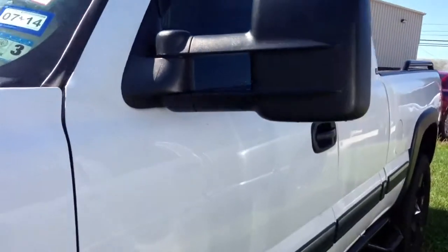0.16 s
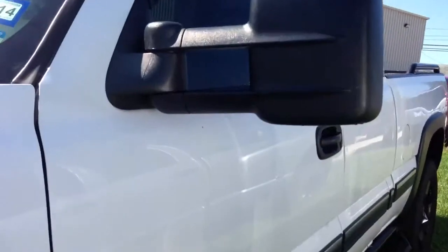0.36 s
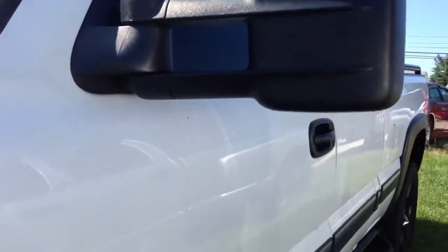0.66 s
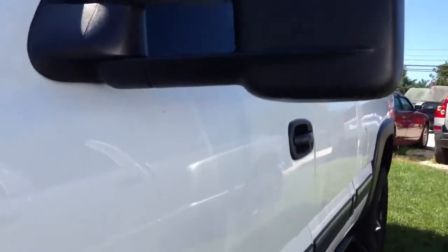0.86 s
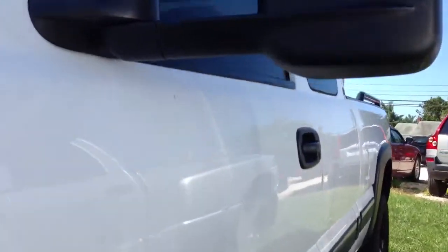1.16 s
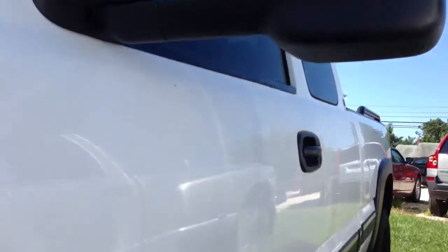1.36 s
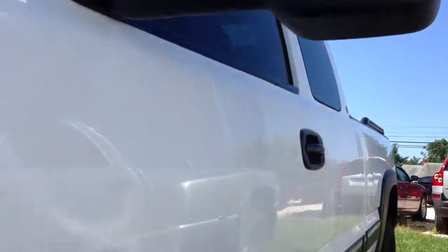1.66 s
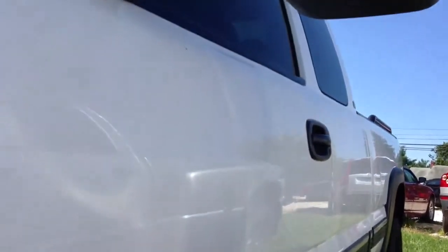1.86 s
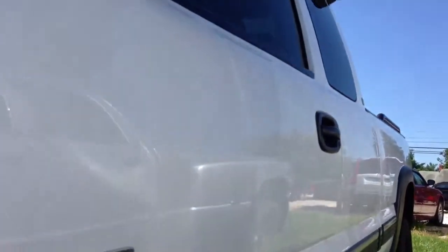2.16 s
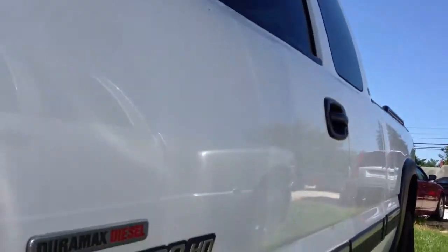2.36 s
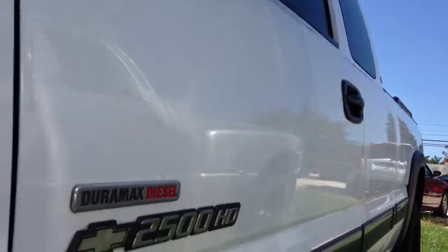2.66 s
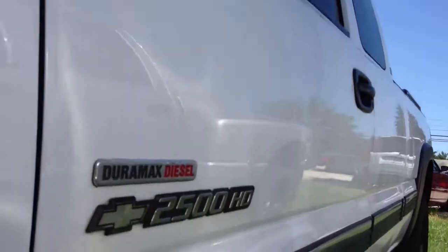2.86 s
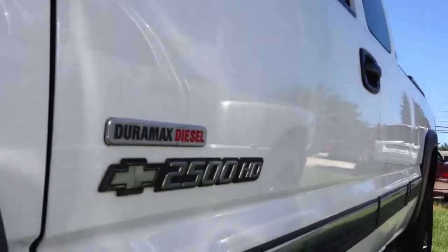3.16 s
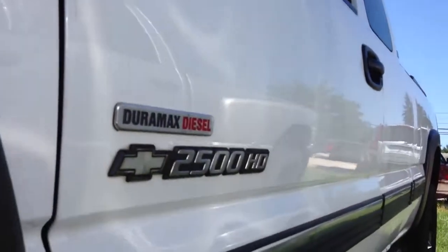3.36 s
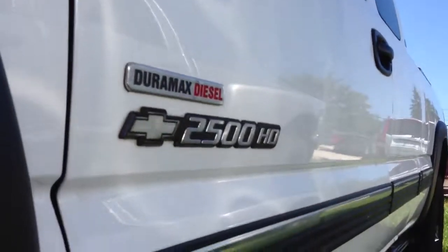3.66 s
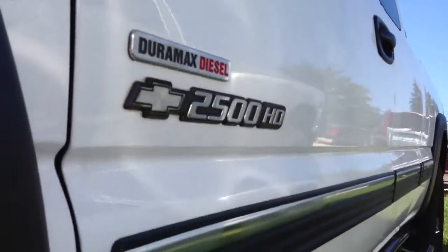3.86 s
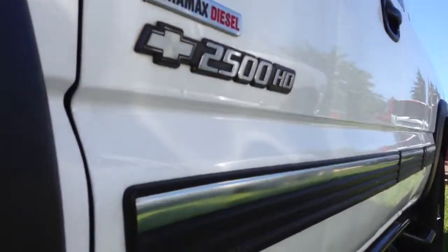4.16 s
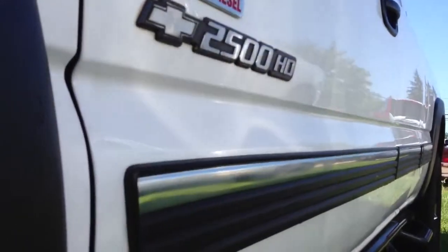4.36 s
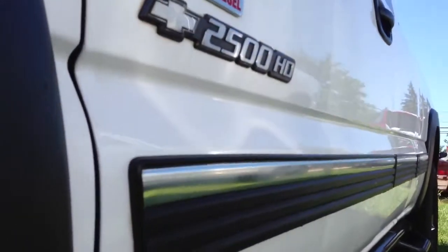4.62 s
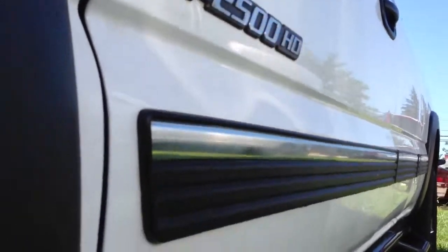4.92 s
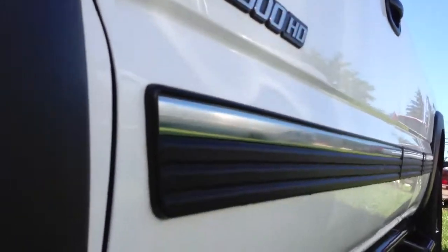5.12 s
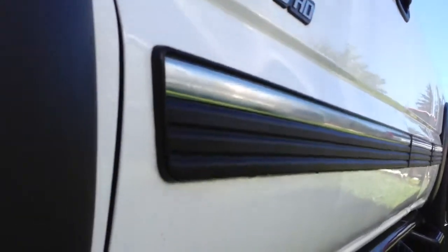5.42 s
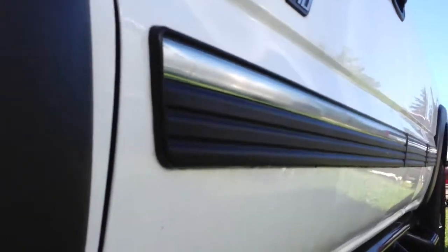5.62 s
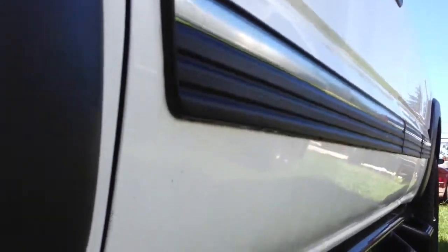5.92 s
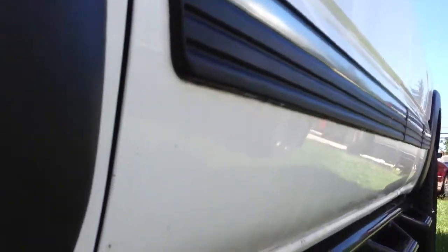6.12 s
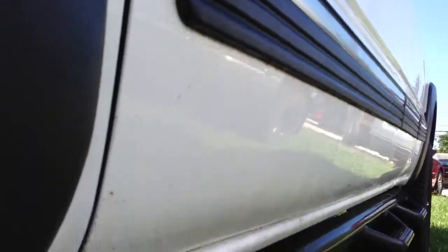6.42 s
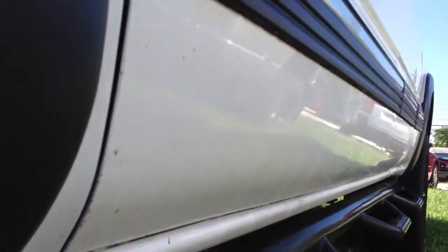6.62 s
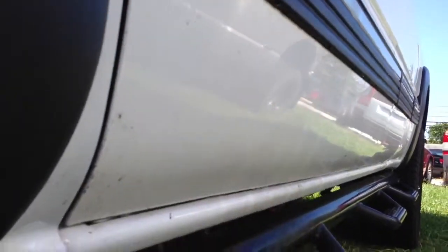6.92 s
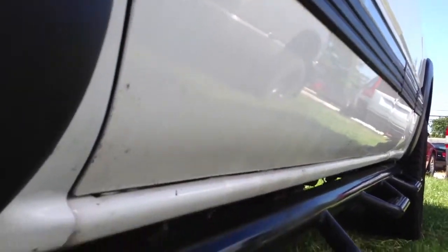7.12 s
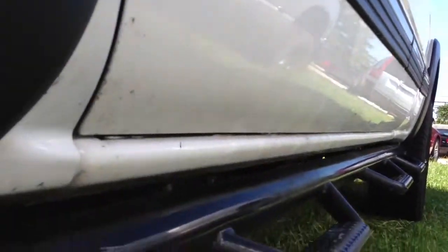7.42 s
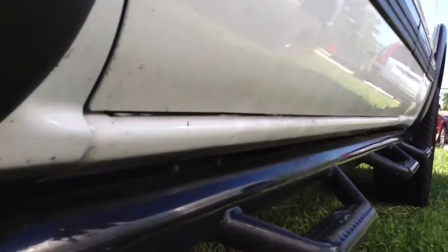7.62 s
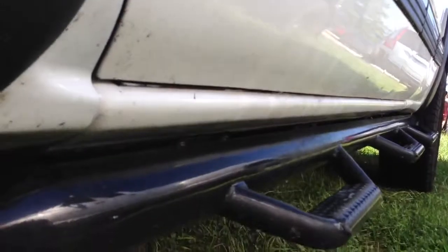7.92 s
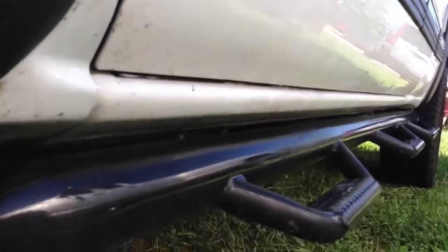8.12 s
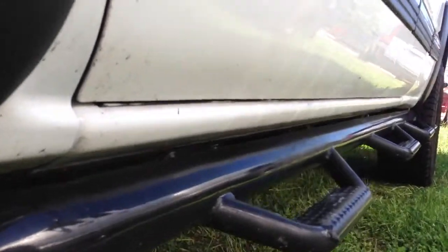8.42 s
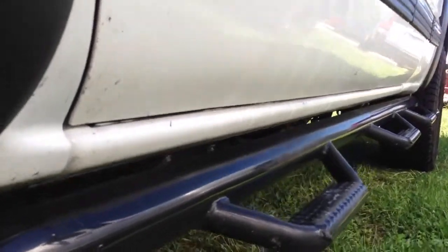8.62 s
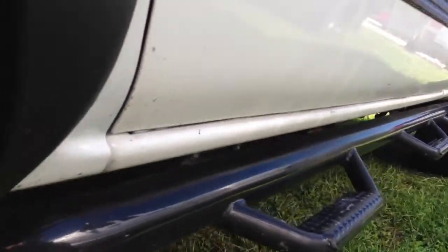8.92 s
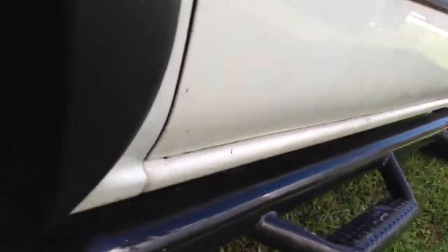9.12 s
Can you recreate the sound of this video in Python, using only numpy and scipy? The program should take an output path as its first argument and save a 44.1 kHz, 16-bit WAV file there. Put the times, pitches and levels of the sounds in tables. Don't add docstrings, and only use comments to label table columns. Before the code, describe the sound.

Low diesel idle hum beside a truck on grass, bumpy handling thuds, cloth rustle and small clicks, a thin cricket trill and katydid buzzes behind.

```python
import sys
import numpy as np
from scipy import signal
from scipy.io import wavfile
from scipy.ndimage import uniform_filter1d

SR = 44100
rng = np.random.default_rng(int(sys.argv[2]) if len(sys.argv) > 2 else 0)


def ratio_of_db(decibels):
    return 10 ** (np.asarray(decibels, float) / 20)


def transcribe(signal):
    frames = np.atleast_2d(signal).T
    limited = np.clip(frames, -1, 1)
    pcm = np.round(limited * 32767).astype(np.int16)
    wavfile.write(sys.argv[1], SR, pcm)


N = 409248
T = np.arange(N) / SR

# (pitch [Hz], level [dB])
HISS_COLOUR = [(300, -15), (2000, -1), (5000, 2.5), (10000, -3), (15000, -1)]
# (first buzz [s], gap [s], buzzes [count], level [dB], pitch [Hz])
KATYDID_PHRASES = [(.05, .17, 4, -66, 9430), (.76, .158, 3, -66, 9400), (1.235, .172, 6, -66, 9350),
                   (2.27, .2, 2, -65.5, 9380), (2.635, .2, 2, -65, 9330), (3.04, .171, 6, -63.5, 9400),
                   (4.02, .165, 6, -70, 9350), (5, .15, 3, -68, 9400), (5.585, .14, 2, -66.5, 9300),
                   (5.98, .152, 2, -65, 9300), (6.284, .1545, 9, -61, 9330), (6.828, .1535, 6, -66, 9500),
                   (7.745, .16, 3, -62, 9520), (8.224, .172, 4, -63, 9560), (8.9, .172, 3, -63, 9560),
                   (.086, .2, 6, -64.5, 9010), (2.39, .2, 4, -69, 8950), (3.39, .196, 4, -67.5, 8970),
                   (4.168, .19, 2, -64, 8980), (4.92, .198, 3, -66, 8950), (5.724, .2, 3, -66, 8930),
                   (8.79, .15, 3, -67, 9030), (7.6, .16, 1, -63, 9300)]
# (time [s], level [dB])
CRICKET_LEVEL = [(0, -83), (.6, -85), (.95, -77), (1.45, -85), (1.8, -78), (2.05, -89), (2.45, -79.5),
                 (3, -81.5), (3.25, -75), (3.8, -89.5), (4.25, -75), (5, -83.5), (5.55, -72.5),
                 (6.2, -80.5), (7.35, -79.5), (7.8, -77), (8.6, -77.5), (9.28, -75)]
# (time [s], lead [strokes], tiredness [0-1])
CRICKET_PACE = [(0, .52, 0), (.85, .34, 0), (2, .34, 0), (2.4, .45, 0), (3, .46, 0), (3.5, .5, 0),
                (4, .5, 0), (4.4, .54, 0), (5, .54, 0), (6.9, .44, 0), (7.15, .43, 1), (8.2, .48, 1),
                (8.7, .52, .4), (9.1, .5, .4), (9.28, .44, 0)]
# (time [s], half length [s], level change [dB])
CRICKET_LEANS = [(.35, .07, 4), (.8, .04, 4), (1.35, .06, 4), (1.77, .05, 2), (1.92, .07, -4),
                 (2.33, .06, -5), (2.76, .1, 3), (3.08, .05, -4), (3.88, .1, 4), (6.9, .12, 2),
                 (7.25, .15, -2), (8.6, .08, 3.5), (8.82, 0.078, -8), (9.03, .1, 3), (9.18, .03, -8)]
# (pitch [Hz], level [dB])
RUMBLE_COLOUR = [(12, -51), (20, -27.5), (64, -27.5), (81, -16), (103, -13), (120, -4), (160, -43),
                 (260, -120)]
# (time [s], level change [dB])
RUMBLE_SWELLS = [(0, 2), (.8, 2.5), (1.4, 16.5), (1.8, 1), (2.2, 0), (2.55, 5), (2.9, -2), (3.45, 5),
                 (3.8, -11), (4.6, -10), (5.5, -6), (7.5, 2), (9.28, -2.5)]
# (time [s], wind level [dB], wash level [dB])
AIR_LEVELS = [(0, -54, -53.5), (.6, -50.5, -53.5), (1.1, -52.5, -54.5), (1.6, -55, -55.5),
              (2.4, -59.5, -60), (2.8, -58, -62.5), (3.3, -55, -59.5), (3.9, -57.5, -59.5),
              (4.8, -55, -61.5), (5.2, -56.5, -63), (6, -56.5, -63.5), (6.8, -64, -67), (7.6, -60.5, -64.5),
              (8, -63.5, -64.5), (8.75, -64.5, -64.5), (9.1, -56, -60.5), (9.28, -60, -60)]
# (pitch [Hz], level [dB])
WIND_COLOUR = [(200, -21), (250, 0), (330, -1), (410, 1), (480, -6.5), (600, -9), (900, -35)]
# (pitch [Hz], level [dB])
WASH_COLOUR = [(290, -31), (500, -38), (628, -2), (692, -1), (808, -1.5), (944, -2.5), (1190, 0),
               (1330, -3.5), (1750, -5), (2570, -10.5), (3100, -16.5), (3500, -16.5), (4550, -40),
               (7700, -120)]
# (pitch [Hz], width [Hz], level [dB])
HUMMING_PANELS = [(817, 44, 3.5), (1029, 58, 1), (1247, 22, -5), (1442, 77, 0.5), (1710, 81, -11),
                  (2320, 190, -9.5)]
# (pitch [Hz], level [dB])
RUSTLE_COLOUR = [(1500, -6), (2400, -4.5), (3200, -0.5), (4200, -2), (7000, -7), (10000, -18.5)]
# (pitch [Hz], level [dB])
FIZZ_COLOUR = [(6000, -8), (9000, 7.5), (15300, -8)]
# (time [s], half length [s], rustle level [dB], fizz level [dB])
WALKER_BRUSHES = [
    (0.022, 0.05, -63, -84),
    (.3, .1, -72, -79),
    (.55, 0.12, -63.5, -79),
    (0.744, 0.17, -67, -86),
    (0.906, 0.13, -62.5, -75),
    (8.93, .08, -79, -86),
    (9.083, 0.1, -69.5, -78),
]
# (pitch [Hz], width [Hz])
LOOSE_TRIM = [(1750, 140), (2050, 130), (2400, 120), (2750, 150)]
# (time [s], half length [s], pitch [Hz], width [Hz], level [dB])
SCUFF_PATCHES = [(0.438, .018, 1710, 64, -55), (.7, 0.023, 2450, 500, -58), (0.54, 0.022, 1750, 200, -61),
                 (.82, 0.028, 2490, 350, -59), (1.003, .04, 2300, 500, -61), (0.898, 0.013, 2350, 400, -60),
                 (1.25, .05, 2160, 250, -65), (1.2, .2, 1900, 1100, -74), (4.299, .25, 1700, 1200, -71),
                 (5.15, .15, 960, 200, -64), (1.65, .2, 1820, 500, -65), (1.78, 0.22, 3450, 350, -69.5),
                 (4.06, 0.03, 2200, 1000, -62), (4.16, .03, 1900, 900, -66), (7.75, 0.35, 2200, 500, -74.5),
                 (7.95, 0.35, 1280, 320, -71.5), (8.05, .3, 1630, 250, -75), (8.5, .05, 1500, 500, -66.5),
                 (8.92, 0.17, 1600, 400, -67.5), (9.0, 0.26, 4200, 700, -71),
                 (9.22, 0.12, 1700, 500, -63.5), (.04, .04, 5000, 500, -65), (9.22, .08, 4300, 400, -74),
                 (1.2, .15, 1200, 40, -64), (1.38, .1, 1240, 40, -65), (1.7, .1, 1250, 40, -66),
                 (1.25, .2, 800, 40, -66), (2.2, .25, 810, 50, -70), (2.85, .18, 1200, 40, -72),
                 (3.35, .25, 1010, 35, -70), (3.8, .2, 1050, 40, -68), (5.45, .4, 4240, 70, -82),
                 (6.6, .35, 4220, 80, -81), (9.05, 0.2, 3930, 80, -78), (3.4, 0.11, 2050, 50, -76),
                 (2, .12, 1260, 40, -70), (.7, .1, 2520, 70, -67)]
# (time [s], peak level [dB], ring pitch [Hz], time to die by 60 dB [s])
LIGHT_CLICKS = [(.084, -51.5, 2280, .03), (0.7, -53, 1700, .02), (.785, -50, 1740, .02),
                (.959, -52, 1600, .03), (1.033, -53, 1800, .03), (0.43, -55, 1800, .03),
                (0.801, -54, 2500, 0.11), (.892, -54, 2400, 0.057), (7.1256, -56, 1850, 0.014),
                (8.447, -54, 1050, .015), (9.057, -56, 2600, 0.014), (9.1635, -53.5, 2500, 0.014),
                (9.172, -61, 1600, .04), (7.803, -61, 2150, .02), (8.436, -65, 1900, 0.041),
                (7.1256, -62, 2780, .012), (7.1256, -62, 2300, .01), (9.158, -46.5, 720, 0.022),
                (8.4, -61, 800, .03), (8.9416, -60, 1750, .012), (7.116, -63, 2000, .012),
                (.8, -53, 5800, .02), (7.1256, -58.5, 4500, .005), (7.1262, -61, 1220, 0.014),
              (9.021, -58, 4000, .01), (9.058, -61, 4600, .01), (9.07, -62, 5200, .006),
              (9.08, -60, 4300, .004), (9.08, -62, 5300, .004), (7.132, -61, 1700, .01),
              (0.59, -53, 2600, 0.022), (1.0, -55, 2200, 0.044), (9.0204, -56, 4570, .008),
              (9.079, -60, 6300, .006), (9.066, -63, 6000, .006), (9.163, -58, 2700, .012),
              (9.03, -62, 3600, .008), (9.133, -62, 2500, .008), (0.91, -60, 5400, .02),
              (9.023, -58, 3000, .008)]
# (time [s], peak level [dB], pitch [Hz], length [s])
MIC_PUFFS = [(0.223, -38.5, 368, 0.035), (0.318, -43, 290, 0.027), (0.642, -37, 286, 0.03),
             (0.684, -38, 409, 0.02), (0.948, -39.5, 316, 0.032), (1.001, -31.5, 364, 0.024),
             (1.384, -46, 356, 0.037), (1.536, -34, 303, 0.032), (1.554, -37, 600, 0.032),
             (1.575, -35, 453, 0.026), (1.612, -48, 320, 0.02), (2.167, -40, 330, 0.021),
             (2.585, -47, 450, 0.026), (2.725, -42.5, 413, 0.024), (3.227, -41.5, 320, 0.048),
             (3.531, -43, 408, 0.023), (4.92, -53, 560, 0.019), (8.432, -47, 500, 0.039),
             (8.453, -53, 417, 0.017)]
# (time [s], peak level [dB], quickness [Hz])
PRESSURE_JABS = [(0.2312, -23, 200), (.2455, -27, 257), (0.2587, -30, 330), (0.278, -27, 217),
                 (.339, -28, 236), (0.373, -29.5, 200), (0.388, -42, 600), (0.9611, -33, 230),
                 (1.007, -36, 380), (1.016, -34, 360), (1.0278, -32, 340), (1.0251, -33, 380),
                 (1.0045, -37, 340), (1.5503, -31, 380), (1.5583, -33, 420), (1.5625, -28.5, 420),
                 (1.5651, -26, 420), (1.5677, -22, 420), (1.5725, -34, 450), (1.582, -33, 330),
                 (1.5875, -28, 400), (1.5925, -37, 300), (2.095, -35, 247), (1.575, -26, 280),
                 (1.682, -37, 300), (1.7028, -29.5, 198), (2.524, -30, 180), (2.5705, -32, 215),
                 (2.5672, -38, 360), (2.5787, -37, 460), (2.5831, -32, 460), (2.583, -27, 190),
                 (2.549, -32, 170), (2.582, -30, 460), (2.7056, -37, 270), (2.7394, -37, 420),
                 (2.7323, -32.5, 300), (2.7533, -29, 200), (3.218, -30, 198), (3.2658, -29, 300),
                 (3.2795, -30.5, 230), (3.4285, -31.5, 290), (3.4403, -34, 280), (3.505, -32.5, 197),
                 (4.0286, -32, 239), (4.062, -35.5, 328), (4.892, -38, 298), (4.92, -30.5, 270),
                 (4.9272, -34, 400), (4.906, -41, 300), (4.93, -38, 360), (8.4502, -35, 480),
                 (8.4575, -42, 400), (8.464, -36.5, 239), (9.1605, -42, 640), (1.772, -41.5, 400),
                 (1.625, -38, 270), (9.147, -47, 500), (9.061, -47, 600)]
# (pitch [Hz], level [dB])
PIPE_RESPONSE = [(40, -44), (90, -27), (110, -26), (140, -15), (162, -15), (184, 0), (210, -1), (222, -12),
                 (236, -20), (260, -28), (400, -34), (600, -50)]
# (pitch [Hz], level [dB])
BURN_COLOUR = [(70, -37), (100, -36), (130, -13), (160, -0.5), (185, 3), (210, -9), (235, -12), (270, -24),
               (330, -34)]
# (time [s], crankshaft speed [turns/s])
IDLE_SPEED = [(0, 11.29), (.5, 11.23), (.9, 11.03), (1.6, 10.91), (2.5, 10.8), (3.9, 10.84), (4.2, 11.03),
              (4.8, 11.53), (5.1, 12.02), (5.4, 12.3), (5.7, 12.42), (6.6, 12.37), (7.5, 12.37),
              (7.8, 12.21), (8.1, 11.92), (8.4, 11.81), (9.28, 11.81)]
# (time [s], hum level [dB], odd over even orders [dB], unsteady burn level [dB])
ENGINE_LEVELS = [(0, -44.5, -11, -40.5), (.3, -50.5, -5.5, -39), (.6, -54.5, -5, -44), (1.5, -59, 21, -44),
                 (1.85, -57, -4, -39), (2.15, -50.5, 12, -44), (2.5, -52, 20, -45), (3.3, -50.5, -2, -43.5),
                 (3.9, -48, 12, -44.5), (4.5, -45, 10, -45.5), (4.8, -41.5, 8, -42), (5.1, -39, 9, -47),
                 (5.4, -39.5, 10, -48), (6.3, -44.5, 13, -51), (7.3, -44.5, 10, -54), (7.8, -48, 10, -50),
                 (8.4, -54, 6, -52), (9.28, -50, 4, -54)]

BASS_CUT = signal.butter(4, 120, "high", fs=SR, output="sos")


def evened(x):
    return x / np.sqrt(np.mean(x ** 2) + 1e-20)


def read(points, hz):
    f, value = np.transpose(points)
    return np.interp(np.log(hz + 1), np.log(f + 1), value, left=-90, right=-90)


def columns(rows):
    s, *rest = np.transpose(rows)
    return [np.interp(T, s, c) for c in rest]


def add(mix, s, sound):
    part = mix[max(round(s * SR), 0):][:len(sound)]
    part += sound[:len(part)]


def drift(rate_hz):
    steps = rng.standard_normal(400)
    return np.interp(T * rate_hz, np.arange(400), uniform_filter1d(steps, size=2) * np.sqrt(2))


def noise(points, patchy_db, size=1024):
    frames = 4 * N // size + 12
    hz = np.fft.rfftfreq(size, 1 / SR)
    a, b, patches = rng.standard_normal((frames, len(hz), 3)).T
    patches = uniform_filter1d(patches, size=10, axis=0)
    patches = evened(uniform_filter1d(patches, size=10, axis=1))
    z = (a + 1j * b) * ratio_of_db(read(points, hz)[:, None] + patchy_db * patches)
    sound = signal.istft(z, nperseg=size, noverlap=3 * size // 4)[1]
    return evened(sound[size:N + size])


def band(x, hz, width):
    r = np.exp(-np.pi * width / SR)
    return signal.lfilter([1, 0, -1], [1, -2 * r * np.cos(2 * np.pi * hz / SR), r * r], x)


def hiss():
    return ratio_of_db(-68) * noise(HISS_COLOUR + [(20000, HISS_COLOUR[-1][1])], patchy_db=0.1)


def rumble():
    swell_db = columns(RUMBLE_SWELLS)[0] + 1.5 * drift(8)
    return ratio_of_db(swell_db - 63) * noise(RUMBLE_COLOUR, patchy_db=3.5, size=4096)


def katydids():
    out = np.zeros(N)
    for first, gap, count, db, pitch_hz in KATYDID_PHRASES:
        for s in first + gap * np.arange(count):
            hz = pitch_hz + 60 * rng.standard_normal()
            at = np.cumsum(SR / 132 * rng.uniform(.92, 1.08, 10)).astype(int) - 280
            scrapes = np.zeros(3500)
            scrapes[at] = at < .05 * SR
            rasp = signal.lfilter([1], [1, -.991], scrapes) * rng.standard_normal(3500)
            buzz = band(band(rasp, hz, 290), hz, 330)
            level = ratio_of_db(db - 14 + 1.2 * rng.standard_normal())
            add(out, s - .012, level * evened(buzz))
    return out


def cricket():
    strokes_per_s, sag_hz, fall_hz, tired_fall_hz = 17.05, 50, 519, 130
    (level_db,), (lead, tired) = columns(CRICKET_LEVEL), columns(CRICKET_PACE)
    phase = (T * strokes_per_s + lead + 0.054 * drift(10) + .5) % 1 - .5
    u = np.clip(phase / .4 + .62, 0, 1)
    fall = (fall_hz + tired_fall_hz * tired) * u ** (6.5 - 3 * tired)
    hz = 8050 - sag_hz * tired - fall + 25 * drift(30)
    stroke = np.sin(np.pi * u ** 1.44) * ratio_of_db(0.88 * drift(14))
    teeth = 1 + 0.24 * evened(band(rng.standard_normal(N), 230, 280))
    tone = stroke * teeth * np.sin(2 * np.pi * np.cumsum(hz) / SR)
    for s, half, db in CRICKET_LEANS:
        level_db = level_db + db * np.exp(-((T - s) / half) ** 2)
    return ratio_of_db(level_db + 3.5) * evened(tone)


def wash():
    _, wash_db = columns(AIR_LEVELS)
    panels = np.zeros(N)
    for hz, width, db in HUMMING_PANELS:
        panels += ratio_of_db(db + 2.5 * drift(6)) * evened(band(rng.standard_normal(N), hz, width))
    sound = ratio_of_db(wash_db - 1.5) * (noise(WASH_COLOUR, patchy_db=1.5) + ratio_of_db(-14.5) * panels)
    low = signal.sosfiltfilt(signal.butter(2, 1000, fs=SR, output="sos"), sound)
    shade_db = np.interp(T, (5.9, 7.8), (0, -2.5))
    return sound - (1 - ratio_of_db(shade_db)) * low


def wind():
    wind_db, _ = columns(AIR_LEVELS)
    return ratio_of_db(wind_db - 1.2 + 0.83 * drift(25)) * noise(WIND_COLOUR, patchy_db=1)


def grit():
    hits_per_s = 60
    rattle = np.zeros(N)
    for hz, width in LOOSE_TRIM:
        hits = (rng.random(N) < hits_per_s / SR) * ratio_of_db(3 * rng.standard_normal(N))
        rattle += evened(band(band(hits, hz, width), hz, 3 * width))
    return ratio_of_db(-4.5) * evened(rattle)


def rustle():
    _, wash_db = columns(AIR_LEVELS)
    s, half, rustle_db, fizz_db = np.transpose(WALKER_BRUSHES)
    swells = np.exp(-((T[:, None] - s) / half) ** 2)
    rustle_gain = np.sqrt(ratio_of_db(2 * (wash_db - 10)) + swells @ ratio_of_db(2 * rustle_db))
    fizz_gain = np.sqrt(ratio_of_db(2 * -79) + swells @ ratio_of_db(2 * fizz_db))
    coarse = noise(RUSTLE_COLOUR, patchy_db=2, size=512) + grit()
    fine = noise(FIZZ_COLOUR, patchy_db=2.5, size=512)
    return rustle_gain * ratio_of_db(0.33 + 0.56 * drift(10)) * coarse + fizz_gain * ratio_of_db(3.5) * fine


def scuffs():
    out = np.zeros(N)
    for s, half, hz, width, db in SCUFF_PATCHES:
        t = np.arange(-2 * half, 2 * half, 1 / SR)
        grain_db = 3 * evened(band(rng.standard_normal(len(t)), 60, 200))
        grain = rng.standard_normal(len(t)) * ratio_of_db(grain_db)
        rub = evened(band(band(grain, hz, width), hz, 2 * width))
        add(out, s + t[0], ratio_of_db(db) * np.exp(-(t / half) ** 2) * rub)
    return out


def clicks():
    out, t = np.zeros(N), np.arange(3000) / SR
    for s, db, hz, t60 in LIGHT_CLICKS:
        blow = rng.standard_normal(len(t)) * ratio_of_db(-60 * t / t60)
        blow[0] += 5
        tick = band(band(blow, hz, 0.055 * hz + 5 / t60), hz, 0.56 * hz)
        add(out, s, ratio_of_db(db + 6.5) * tick / abs(tick).max())
    return out


def puffs():
    out, t = np.zeros(N), np.arange(3000) / SR
    for s, db, hz, length in MIC_PUFFS:
        u = t / length
        soften = signal.butter(3, 1.5 * hz, fs=SR, output="sos")
        dull = signal.sosfilt(soften, rng.standard_normal(len(u)))
        thud = evened(band(band(dull, 213, 126), 213, 126))
        puff = evened(band(dull, hz, 0.14 * hz)) + 0.61 * thud
        puff = signal.sosfilt(BASS_CUT, puff * u * np.exp(-4 * u ** 4.4))
        add(out, s - .002, ratio_of_db(db) * puff / abs(puff).max())
    return out


def thuds():
    out, t = np.zeros(N), np.arange(-660, 1100) / SR
    for s, db, hz in PRESSURE_JABS:
        cycles = t * hz
        spread = np.where(t < 0, 0.63, 0.8)
        jab = -np.cos(2 * np.pi * cycles) * np.exp(-(cycles / spread) ** 2)
        add(out, s + t[0], ratio_of_db(db) * jab)
    return signal.sosfiltfilt(signal.butter(2, 75, "high", fs=SR, output="sos"), out)


def burn(rough_db):
    wide_db = rough_db + .4 * np.minimum(rough_db + 43, 0)
    in_pipe = ratio_of_db(rough_db - 3.5) * noise(PIPE_RESPONSE, patchy_db=3, size=4096)
    return in_pipe + ratio_of_db(wide_db) * noise(BURN_COLOUR, patchy_db=1.5, size=4096)


def engine():
    (speed,), (hum_db, uneven_db, rough_db) = columns(IDLE_SPEED), columns(ENGINE_LEVELS)
    turns = -.21 + np.cumsum(speed) / SR
    out = burn(rough_db)
    for first, db in ((5, hum_db), (4, hum_db - uneven_db)):
        family = np.zeros(N)
        for k in range(first, 30, 2):
            gain = ratio_of_db(read(PIPE_RESPONSE, k * speed) + 1.3 * drift(7))
            smear = k ** 2 / 28
            lag = .2 * (1 - k % 2)
            angle = k * turns + smear - lag + .035 * drift(6)
            family += gain * np.cos(2 * np.pi * angle)
        strength = np.sqrt(uniform_filter1d(family ** 2, size=SR // 2))
        out = out + ratio_of_db(db) * family / strength
    return out


def scene():
    insects = katydids() + cricket()
    surroundings = rumble() + wash() + wind() + rustle()
    handling = scuffs() + clicks() + puffs() + thuds()
    return (insects + surroundings + handling + engine())[None]


def band_limit(x):
    return signal.sosfilt(signal.butter(12, 15345, fs=SR, output="sos"), x)


def record(dry):
    opening = np.minimum(.3 + T / .012, 1)
    heard = dry * opening + hiss()
    limit = signal.firwin(801, 15400, window=("kaiser", 12), fs=SR)
    mix = signal.oaconvolve(heard, limit[None], "same")
    return band_limit(mix)


dry = scene()
out = record(dry)
transcribe(out)
```